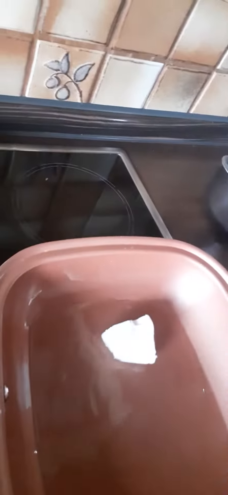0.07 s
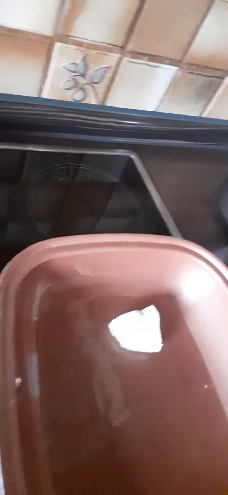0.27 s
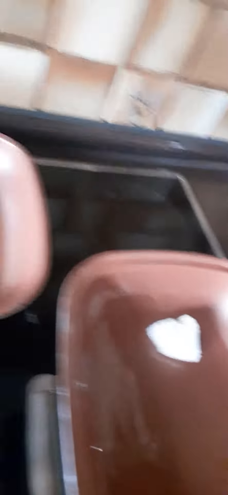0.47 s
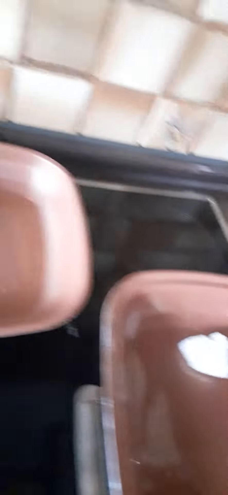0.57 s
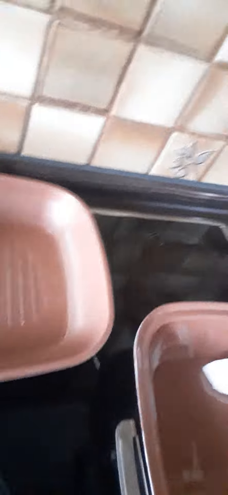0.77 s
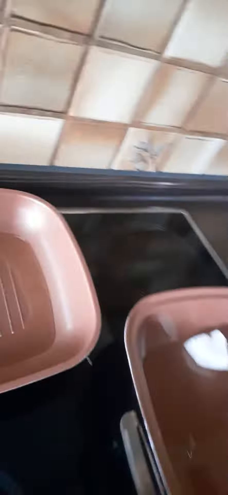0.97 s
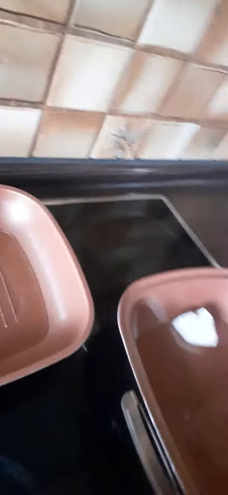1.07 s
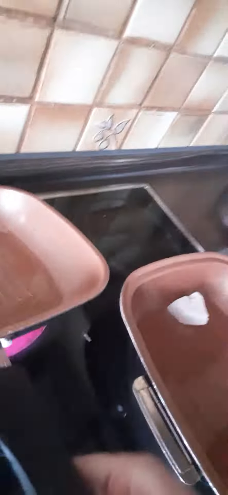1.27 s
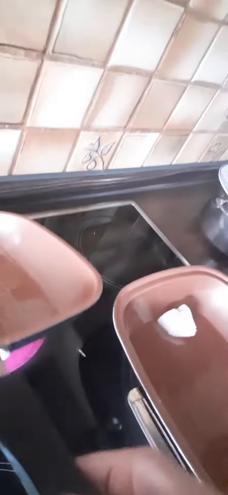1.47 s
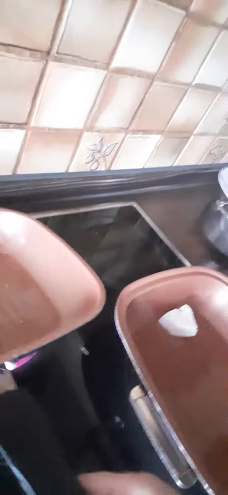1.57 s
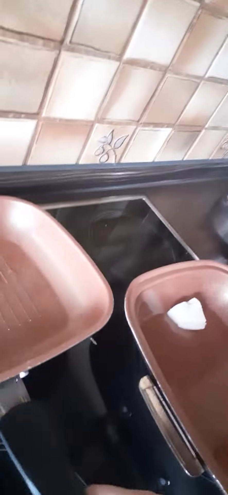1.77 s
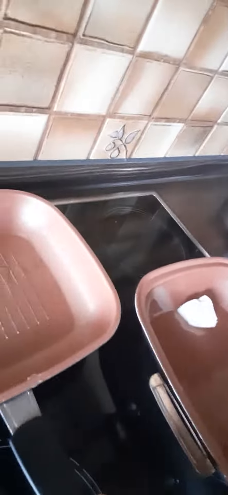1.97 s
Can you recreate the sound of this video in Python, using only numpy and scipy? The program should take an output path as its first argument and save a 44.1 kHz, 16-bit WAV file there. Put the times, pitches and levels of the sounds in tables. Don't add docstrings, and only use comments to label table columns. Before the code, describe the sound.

A metal pan clatters sharply on a glass hob, then a second pan is set down softer

```python
import sys
import numpy as np
from scipy import signal
from scipy.fft import rfft, irfft, next_fast_len
from scipy.io import wavfile
from scipy.ndimage import uniform_filter1d, map_coordinates

SR = 44100
rng = np.random.default_rng(int(sys.argv[2]) if len(sys.argv) > 2 else 0)


def int16_out(signal):
    q = np.round(np.clip(np.atleast_2d(signal).T, -1, 1) * 32767)
    wavfile.write(sys.argv[1], SR, q.astype(np.int16))


def rack_gain(trim_db):
    fader = np.asarray(trim_db, float)
    return 10 ** (fader / 20)


N = 88729
SIDE = np.array([[.5], [-.5]])


def unit(x):
    return x / np.sqrt(np.mean(x ** 2) + 1e-20)


def along(points, hz):
    f, v = np.transpose(points)
    return np.interp(np.log(hz + 1), np.log(f + 1), v)


def wobble(rate):
    knots = rng.standard_normal(int(N * rate / SR) + 4)
    return map_coordinates(knots, [np.arange(N) * rate / SR])


def filtered(x, response):
    m = next_fast_len(N + SR // 10)
    return irfft(rfft(x, m) * response(np.fft.rfftfreq(m, 1 / SR)), m)[..., :N]


def diffuse(pair, colour):
    # frequency in Hz, likeness of the two microphones from 0 to 1.
    alike = [(60, .95), (130, .95), (290, .82), (640, .45), (1400, 0), (15000, 0)]

    def mid_side(hz):
        turn = np.arccos(np.clip(along(alike, hz), -1, 1)) / 2
        return rack_gain(along(colour, hz)) * [np.cos(turn), np.sin(turn)]

    mid, side = filtered(pair, mid_side)
    return np.array([mid + side, mid - side])


def rush(colour, patchy_db):
    z = signal.stft(rng.standard_normal((2, N)), nperseg=512)[2]
    patches = uniform_filter1d(rng.standard_normal(z.shape[1:]), size=5, axis=0)
    patches = unit(uniform_filter1d(patches, size=10, axis=1))
    noise = signal.istft(z * rack_gain(patchy_db * patches), nperseg=512)[1][:, :N]
    return unit(diffuse(noise, colour))


def swell_db(start, peak, end, edge_db):
    fade_s, gone_db = .08, -40
    times = np.sort([start - fade_s, start, peak, end, end + fade_s])
    return np.interp(np.arange(N) / SR, times, [gone_db, edge_db, 0, edge_db, gone_db])


def resonances(f, rows):
    total = 0
    for k, (centre, width, db) in enumerate(rows):
        ring = 1j * f * SR / np.pi / (centre * centre - f * f + 1j * f * width)
        total = total + (-1) ** k * rack_gain(db) * ring
    return total


def kitchen(x, wet_db):
    # frequency in Hz, time to fall 60 dB in seconds.
    decay = [(100, 0.33), (300, 0.3), (1000, 0.29), (3000, 0.29), (8000, 0.25), (14000, 0.23)]
    # frequency in Hz, level in dB.
    tiles = [(60, 7.5), (250, 1.5), (1000, -2), (4000, 4.5), (15000, 0)]
    build_s = 0.0017
    hz, t, z = signal.stft(rng.standard_normal((2, SR // 2)), SR, nperseg=256)
    tail = signal.istft(z * rack_gain(-60 * t / along(decay, hz)[:, None]), SR, nperseg=256)[1]
    tail = tail * (1 - np.exp(-(np.arange(tail.shape[1]) / SR / build_s) ** 2))
    start = SR // 20
    tail = diffuse(np.pad(tail, ((0, 0), (start, 0))), tiles)[:, start:]
    return rack_gain(wet_db) * signal.fftconvolve(x, tail / np.linalg.norm(tail[0]), axes=1)[:, :N]


def struck(contacts, body, ring, ring_db, crack_db, wet_db):
    crack_t60_s, crack_low_hz = 0.033, 1800
    least_width_hz, least_width_share = 30, .05
    damped = [(hz, max(w, least_width_hz + least_width_share * hz), db) for hz, w, db in body]
    lasting = [(hz, np.log(1000) / np.pi / t60, db + ring_db) for hz, db, t60 in ring]
    t = np.arange(SR // 10) / SR
    cracks = rng.standard_normal((len(contacts), 2, len(t))) * rack_gain(crack_db - 60 * t / crack_t60_s)

    def response(f):
        modes = 0.11 * resonances(f, damped + lasting)
        thin = (1j * f / (crack_low_hz + 1j * f)) ** 2
        total = 0
        for (s, db, hard_hz, lag_ms, pan_db), crack in zip(contacts, cracks):
            arrival = np.exp(-2j * np.pi * f * (s + SIDE * lag_ms / 1000))
            push = -rack_gain(db + SIDE * pan_db) * arrival / (1 + 1j * f / hard_hz) ** 2
            body_sound = modes * SR / (2 * np.pi * (1000 + hard_hz))
            total = total + push * (body_sound + thin * rfft(crack, 2 * len(f) - 2))
        return total

    direct = filtered(np.arange(N) == 0, response)
    return direct + kitchen(direct[1:], wet_db)


def fridge():
    # frequency in Hz, rms level in dB, left-right difference in dB.
    hum = [(100.2, -62, 6), (150.4, -69.5, 5), (350, -77, -5), (400, -78.5, -2)]
    unsteady_db, knots_per_s, drift_rad = 1.2, 14, .4
    t = np.arange(N) / SR
    lines = 0
    for hz, db, pan_db in hum:
        level = rack_gain(db + unsteady_db * wobble(knots_per_s) + SIDE * pan_db)
        lines = lines + np.sqrt(2) * level * np.sin(2 * np.pi * hz * t + drift_rad * wobble(knots_per_s))
    return lines


def room_air():
    # frequency in Hz, level in dB per Hz.
    rumble = [(15, -53), (25, -24.5), (48, -8.5), (97, -16), (221, -16.5), (362, -16), (547, -21),
              (600, -25), (780, -57.5), (1320, -120)]
    return rack_gain(-65.5) * rack_gain([[1.5], [-1.5]]) * rush(rumble, patchy_db=5.0)


def microphone_hiss():
    # frequency in Hz, level in dB per Hz.
    hiss = [(1500, -38.5), (2500, -6), (5000, -11), (9000, -11.5), (12000, -1.5), (15500, -6.5)]
    return rack_gain(-81.5) * rush(hiss, patchy_db=2.33)


def stir():
    # time in seconds, handling level in dB, share of the brighter slide from 0 to 1.
    moves = [(0, -70, 0.03), (.3, -71, 0.5), (.38, -62.5, 0.45), (.44, -68, 0), (.5, -58, 0.35),
             (.6, -59, 0.16), (.7, -64, 0.35), (.9, -65, 0.38), (1.03, -71.5, 0.48), (1.16, -60, 0.46),
             (1.23, -69.5, 0.63), (1.5, -69, 0.33), (1.62, -65, 0.99), (2.01, -67.5, 0.8)]
    # frequency in Hz, level in dB per Hz.
    dull_colour = [(240, -31.5), (400, -2), (426, -22), (480, -4), (922, -3.5), (1060, -13), (3500, -39.5),
                   (4550, -66), (7700, -120)]
    slide_colour = [(240, -28.5), (400, -3.5), (454, -23.5), (624, -1.5), (812, -13.5), (1360, -7.5),
                    (1800, -13), (3500, -30), (4550, -58), (7700, -120)]
    s, db, share = np.transpose(moves)
    t = np.arange(N) / SR
    slide = np.interp(t, s, share)
    rub = (1 - slide) * rush(dull_colour, patchy_db=4.0) + slide * rush(slide_colour, patchy_db=2.5)
    return rack_gain(np.interp(t, s, db) + 1.3 * wobble(25)) * rub


def sleeve():
    # start, peak and end in seconds, level in dB, share of fine cloth from 0 to 1.
    strokes = [
        (0.457, 0.501, 0.64, -69, 0.01),
        (0.79, 0.879, 1.42, -68.5, .9),
        (0.933, 1.033, 1.26, -76, .9),
        (1.068, 1.148, 1.44, -65.5, 0.5),
        (1.28, 1.33, 1.6, -58.5, 0.45),
        (1.36, 1.43, 1.5, -70.5, .6),
        (1.536, 1.604, 1.74, -73, .3),
    ]
    # frequency in Hz, level in dB per Hz.
    coarse_colour = [(1470, -35), (2500, -8.5), (3280, -9), (4510, -2.5), (6500, -10), (12700, -10.5),
                     (16000, -17)]
    fine_colour = [(1470, -52), (2500, -18.5), (3570, -23), (3830, -3), (4370, -14), (12200, 1),
                   (16000, -7)]
    coarse = rush(coarse_colour, patchy_db=-0.7)
    fine = rush(fine_colour, patchy_db=1.1)
    cloth = 0
    for start, peak, end, db, share in strokes:
        level = rack_gain(db + swell_db(start, peak, end, edge_db=-15))
        cloth = cloth + level * (share * fine + (1 - share) * coarse)
    return rack_gain(0.73 * wobble(27)) * cloth


def scuffs_and_whine():
    # three times in seconds for start, peak and end (sorted together with the fades, so the middle #
    # one peaks), level in dB, resonance in Hz, its width in Hz.
    rubs = [
        (0.44, .5, 0.67, -75.5, 1950, 149.2),
        (0.57, 0.77, 0.57, -70, 900, 120),
        (0.37, .37, 0.45, -86.5, 1900, 81),
        (1.17, 1.07, 1.22, -67, 970, 180),
        (1.6, 1.85, 2.3, -75.5, 1600, 50),
        (1.55, 1.62, 1.8, -79, 2000, 300),
        (1.5, 2, 2.9, -88, 2880, 60),
        (1.72, 1.86, 2.05, -80, 2500, 200),
    ]
    total = 0
    for start, peak, end, db, hz, width in rubs:
        noise = rng.standard_normal((2, N))
        rub = unit(filtered(noise, lambda f: resonances(f, [(hz, width, 0)]) ** 2))
        total = total + rack_gain(db + swell_db(start, peak, end, edge_db=-8)) * rub
    return total


def worktop():
    # time in seconds, force in dB, hardness in Hz, left lag in ms, left-right difference in dB.
    booms = [
        (.066, -14.5, 200, 0.083, 3.5),
        (.135, -22, 200, 0.092, 4),
        (.24, -32, 198, 0.088, 2.5),
        (.405, -38.5, 200, 0.11, 2),
        (.49, -44, 300, .1, 1),
        (.54, -44, 300, 0.092, 2),
        (1.256, -35, 201, 0, 4),
        (1.31, -39, 199.7, 0.0047, 1),
        (1.365, -36, 200, 0, 2.5),
    ]
    # frequency in Hz, width in Hz, level in dB.
    cabinet = [(61, 30, -1.5), (86, 32, -1.5), (120, 41, -1.5)]
    return struck(booms, cabinet, [], 0, crack_db=-120, wet_db=-8.5)


def ticks():
    # time in seconds, force in dB, hardness in Hz, left lag in ms, left-right difference in dB.
    taps = [
        (.868, -49, 12000, 0.081, -2),
        (1.124, -50.5, 14400, 0.042, -9),
    ]
    return struck(taps, [], [], 0, crack_db=-8.5, wet_db=-5)


def hand_thuds():
    # time in seconds, force in dB, hardness in Hz, left lag in ms, left-right difference in dB.
    thuds = [
        (.172, -25.5, 302, 0.086, 2),
        (.232, -34.5, 300, -0.0047, 7),
        (.372, -47, 306, .1, 4.5),
        (.398, -38.5, 120, 0.11, 5),
        (.4506, -31, 1508, 0.25, -0.5),
        (.4585, -38, 350, 0.12, 2.5),
        (.4705, -40.5, 298, 0.078, 3),
        (.545, -44.5, 123, 0.16, 10),
        (1.362, -42.5, 97, -0.18, -13.5),
    ]
    # frequency in Hz, width in Hz, level in dB.
    glass = [(154, 104, -1.5), (257, 69.5, 3), (518, 150, 3.5), (1010, 265, 6.5), (1640, 560, 2)]
    return struck(thuds, glass, [], 0, crack_db=-28, wet_db=-4)


def pan_set_down():
    # time in seconds, force in dB, hardness in Hz, left lag in ms, left-right difference in dB.
    landings = [
        (1.2531, -17.5, 2080, -0.16, 3.5),
        (1.2556, -36, 10900, -0.087, -7),
        (1.2806, -27.5, 1000, -0.11, -16.5),
        (1.2825, -27, 608, -0.099, -3),
        (1.305, -39, 500, -0.14, -10),
        (1.271, -32.5, 303, -0.08, -2.5),
        (1.382, -35, 400, -0.076, 3),
        (1.397, -37.5, 400, -0.035, 3),
    ]
    # frequency in Hz, width in Hz, level in dB.
    pan_body = [(200, 257, -1.5), (310, 153, -2.5), (496, 270, -21.5), (613, 520, -15), (1000, 188, 1),
                (1350, 154, 4), (1700, 950, 11.5), (2260, 200, 3.5), (2770, 270, -0.5), (4570, 900, -28)]
    # frequency in Hz, level in dB, time to fall 60 dB in seconds.
    pan_ring = [(150, -20, 0.3), (314.7, 2, 0.11), (470, -10.5, .2), (1110, -9, 0.19)]
    return struck(landings, pan_body, pan_ring, -22.5, crack_db=-6, wet_db=3)


def pan_clatter():
    # time in seconds, force in dB, hardness in Hz, left lag in ms, left-right difference in dB.
    knocks = [
        (.0640, -24, 8880, 0.55, -12),
        (.0650, -1, 4770, 0.38, -2.5),
        (.0673, -3.5, 9000, 0.061, 9.5),
        (.0700, -10.5, 11300, 0.41, 1),
        (.085, -15, 2990, 0.13, 5),
        (.103, -27, 1470, 0.55, 6.5),
        (.168, -28.5, 1520, 0.42, -1),
        (.224, -33, 900, 0.43, 8.5),
        (.359, -48.5, 700, 0.52, -3),
    ]
    # frequency in Hz, width in Hz, level in dB.
    pan_body = [(239, 190, -1), (566, 96, 0), (676.6, 52, -0.5), (950, 63, 1), (1290, 120, 4),
                (1885, 200, 2.5), (2723, 170, 0), (4010, 160, 0.5), (4310, 270, -3), (5127, 100, 2.5),
                (6740, 350, -11.5), (8700, 370, -9), (12140, 580, -12)]
    # frequency in Hz, level in dB, time to fall 60 dB in seconds.
    pan_ring = [(117.7, -8, 0.41), (153.3, -16, 0.48), (241.3, -3, .2), (312, -8, .25), (404.5, -12, 0.36),
                (737, -16.5, 0.15), (928, -17, .25), (1300, -18.5, 0.28), (1970, -19, .3),
                (2720, -17, 0.098), (2820, -14, .3), (2880, -23, .28), (3895, -21, .16),
                (5237, -20.5, 0.18)]
    return struck(knocks, pan_body, pan_ring, -13, crack_db=-8, wet_db=1)


def scene():
    background = fridge() + room_air() + microphone_hiss()
    movement = stir() + sleeve() + scuffs_and_whine()
    blows = worktop() + ticks() + hand_thuds() + pan_set_down() + pan_clatter()
    return background + movement + blows


def low_pass(x):
    return signal.sosfilt(signal.butter(12, 16000, fs=SR, output="sos"), x)


def record(dry):
    low_cut_hz, top_hz, top_order = 89.7, 16000, 90
    ceiling, knee = .98, 4

    def phone(hz):
        bass_cut = (1j * hz / (low_cut_hz + 1j * hz)) ** 2
        return bass_cut / (1 + (hz / top_hz) ** (2 * top_order))

    thin = filtered(dry, phone)
    rounded = thin / (1 + np.abs(thin / ceiling) ** knee) ** (1 / knee)
    return low_pass(rounded)


dry = scene()
out = record(dry)
int16_out(out)
```